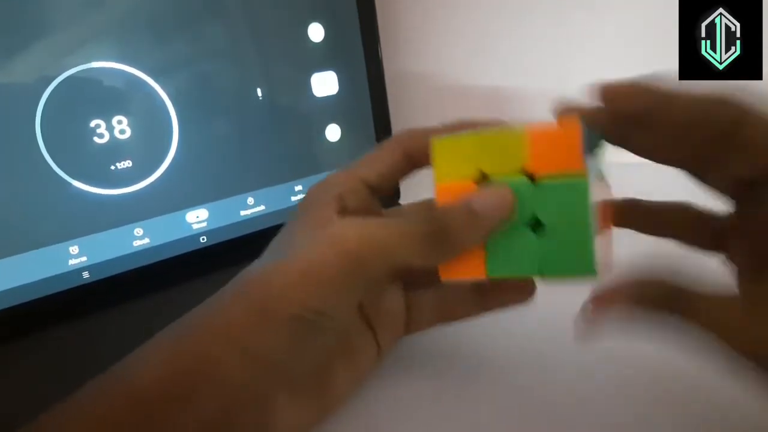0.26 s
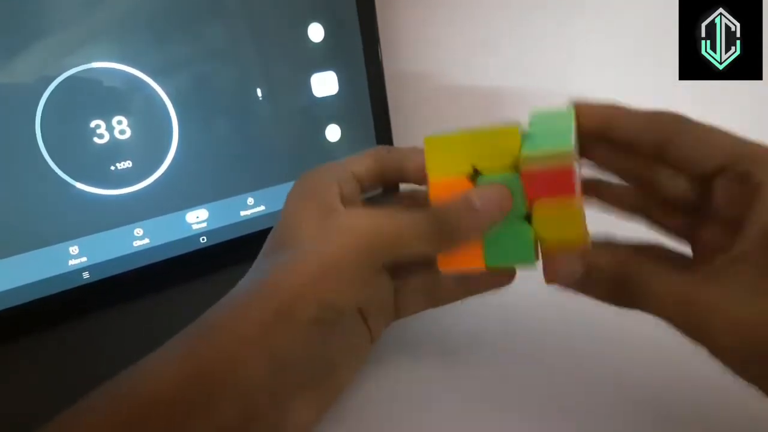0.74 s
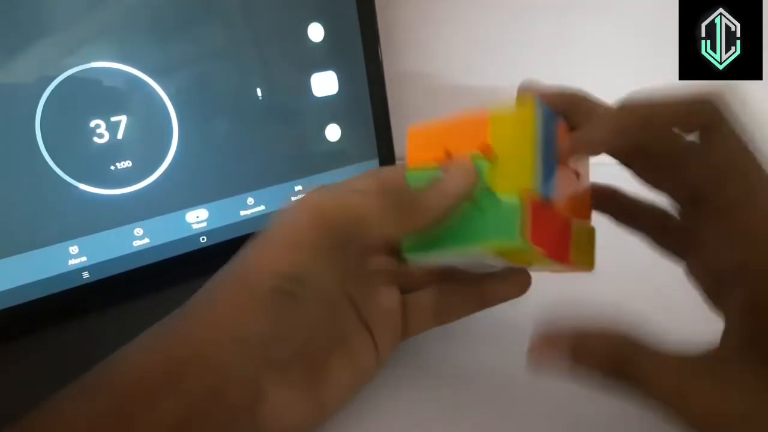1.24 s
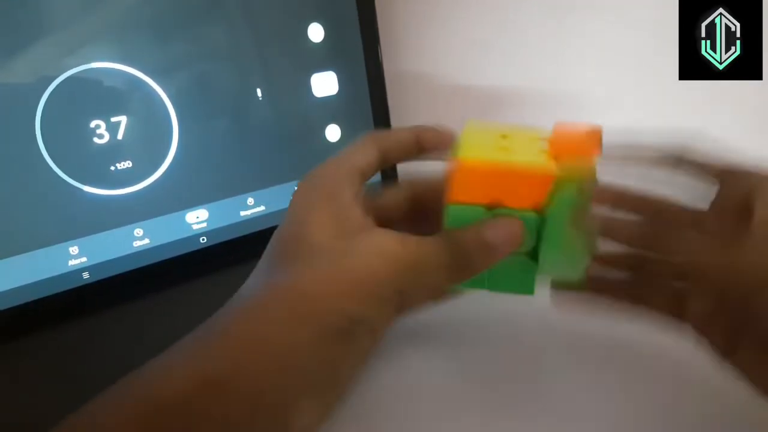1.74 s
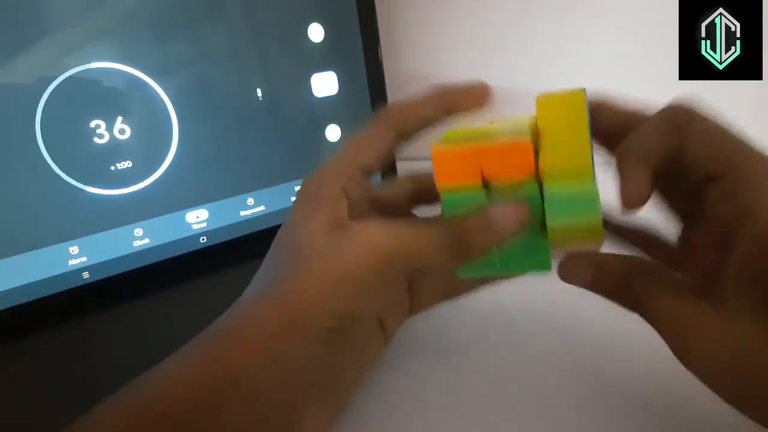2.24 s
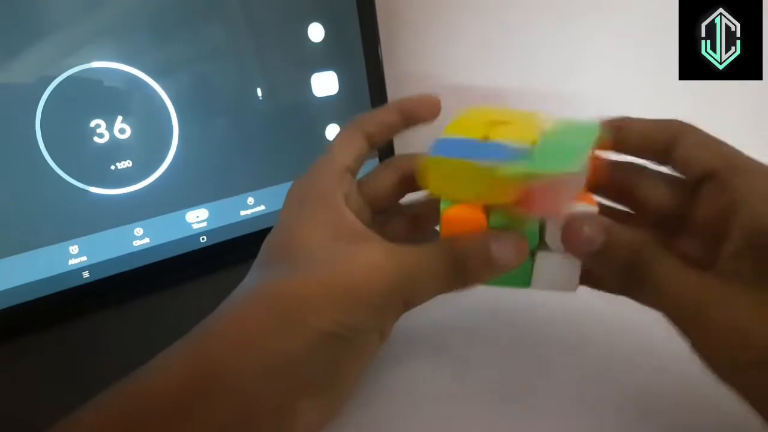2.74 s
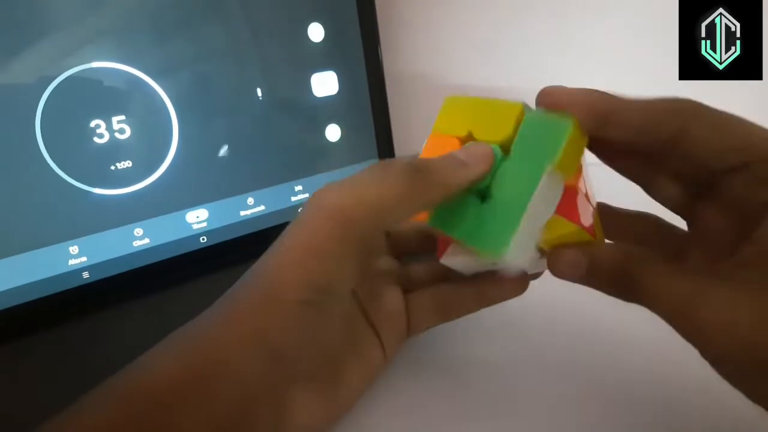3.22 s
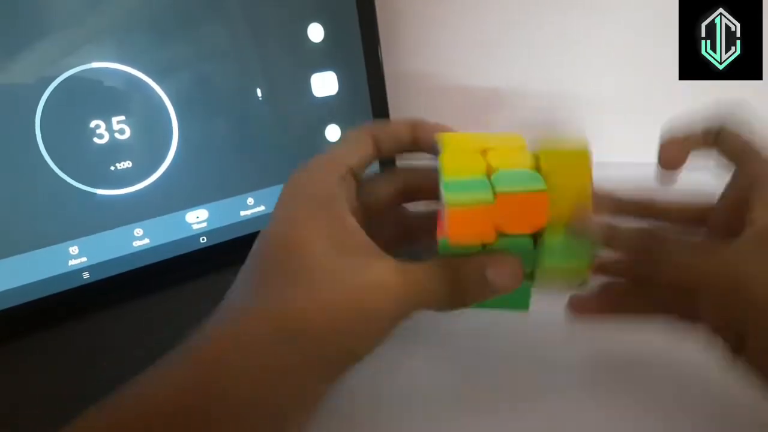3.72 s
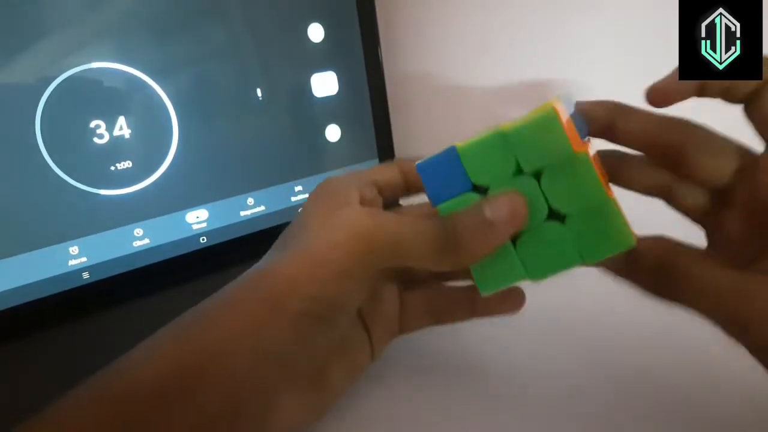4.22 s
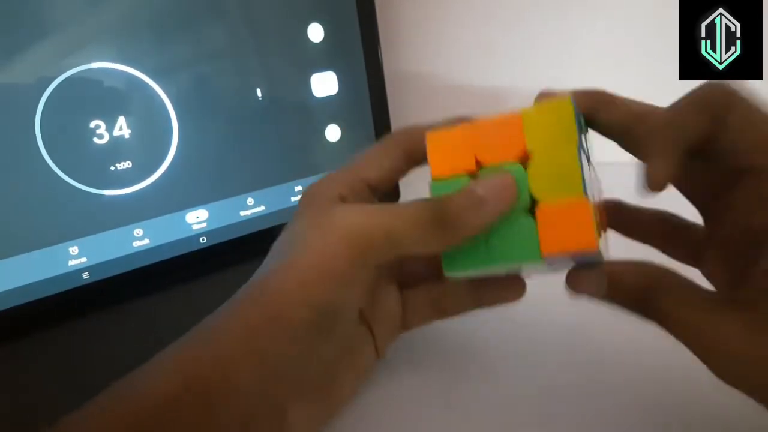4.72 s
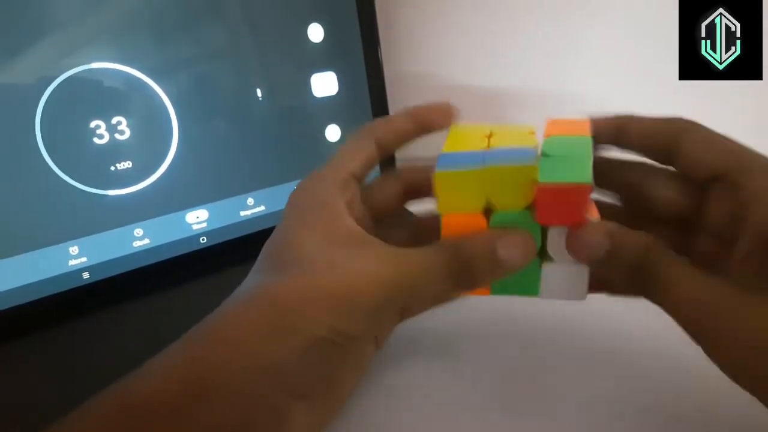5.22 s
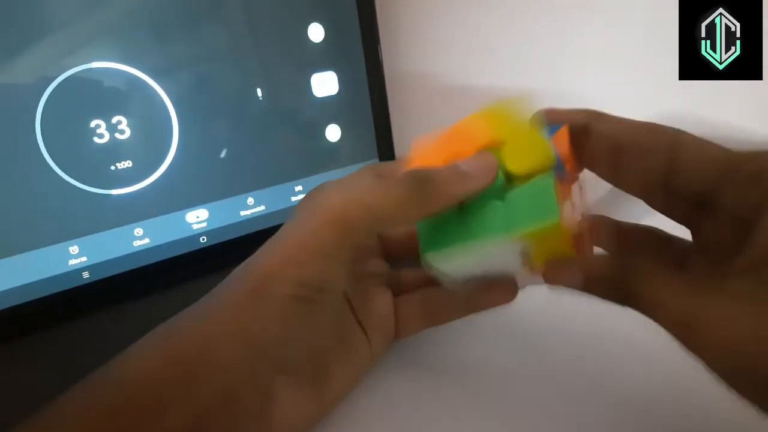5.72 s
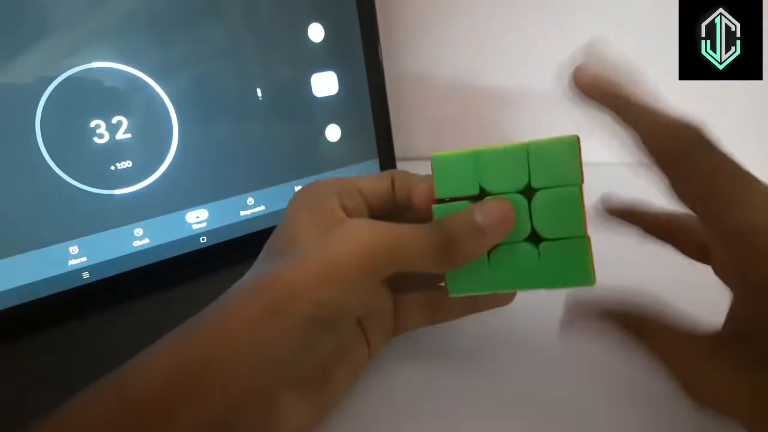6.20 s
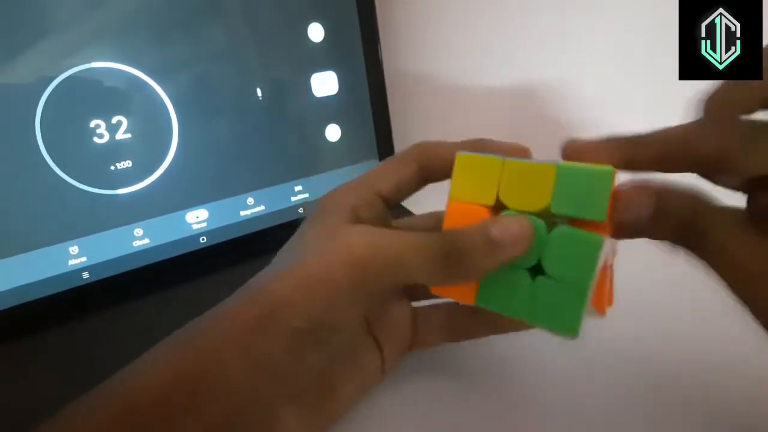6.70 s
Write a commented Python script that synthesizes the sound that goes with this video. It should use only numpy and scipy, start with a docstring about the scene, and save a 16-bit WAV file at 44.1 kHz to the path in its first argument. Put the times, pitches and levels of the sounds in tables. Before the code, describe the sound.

Steady fan air noise fills a small, slightly reverberant room while hands work a plastic cube puzzle near the microphone. Faces rub in short gritty swishes and lock with bright, dry clicks, some hollower, in quick irregular runs. The loudest crack comes midway; the rubbing is strongest near the end. Low wind-like buffets push at the left channel, and turning continues to the cut.

```python
"""A plastic puzzle cube is turned fast by hand in a small room, heard through a left and a right microphone port.
From the start a fan hums as shaped noise and pieces snap: bursts of contacts ring the shell, and the room answers.
Faces scrape in swells of grainy noise. The loudest snap comes near 3.5 s; the rub is strongest near 5.8 and 6.4 s.
The fan's draught buffets the left port with low noise, hardest near 4.8 and 6.4 s. Turning goes on to the end, 6.95 s.
"""
import sys
import numpy as np
from scipy import signal
from scipy.fft import rfft, irfft, next_fast_len
from scipy.io import wavfile
from scipy.ndimage import uniform_filter1d, map_coordinates

SR = 44100
rng = np.random.default_rng(int(sys.argv[2]) if len(sys.argv) > 2 else 0)


def unload_audio(sound):
    """Save the sound as a 16-bit wav file, at the path given as the first command line argument."""
    columns = np.transpose(np.atleast_2d(sound))
    # keep every value between -1 and 1, then stretch to whole-number steps
    steps = np.round(np.clip(columns, -1, 1) * 32767)
    wavfile.write(sys.argv[1], SR, steps.astype(np.int16))


N = 306495


def amp(db):
    """Gain of a level in dB."""
    return 10 ** (np.asarray(db) / 20)


def unit(x):
    """Scale x to an rms of 1."""
    return x / np.sqrt(np.mean(x ** 2) + 1e-20)


def along(points, hz):
    """Read a curve of (Hz, value) points, joined by lines on a log frequency axis."""
    point_hz, value = np.transpose(points)
    return np.interp(np.log(hz + 1), np.log(point_hz + 1), value)


def wobble(rate):
    """A smooth random curve through `rate` random points a second."""
    knots = rng.standard_normal(int(N * rate / SR) + 4)
    return map_coordinates(knots, [np.arange(N) * rate / SR])


def filtered(x, response):
    """Shape the spectrum of x with a response given as a function of frequency."""
    size = next_fast_len(N + SR // 2)
    return irfft(rfft(x, size) * response(np.fft.rfftfreq(size, 1 / SR)), size)[..., :N]


def swells(rows, rise_db_s, fall_db_s):
    """Level in dB of peaks that swell and fade at steady dB per second, their powers added."""
    hop = 64  # samples between computed points
    peak_s, peak_db = np.transpose(rows)[:, :, None]
    late = np.arange(0, N + hop, hop) / SR - peak_s
    drop_db = np.where(late < 0, -rise_db_s * late, fall_db_s * late)
    power = amp(2 * (peak_db - drop_db)).sum(0)
    return np.interp(np.arange(N), np.arange(len(power)) * hop, 10 * np.log10(power + 1e-12))


# Colour of the fan's air noise. Each row: frequency in Hz, relative level in dB per Hz.
FAN_COLOUR = [(25, -36), (60, -17.5), (120, -8), (240, -4), (316, 0), (400, -3.5), (530, -6.5), (660, -19),
              (1050, -13), (1400, -18.5), (1750, -21.5), (2400, -22.5), (4400, -35.5), (16000, -44.5)]
# How alike the fan is at the two ports. Each row: frequency in Hz, likeness (1 the same, 0 unrelated).
FAN_LIKENESS = [(60, 1), (130, 0.83), (300, 0.99), (520, 0.67), (750, 0), (1200, 0.39), (2500, 0),
                (15000, 0.3)]


def fan():
    """Steady air noise, most alike at both ports in the bass: a shared part plus a part of opposite sign."""
    level_db, drift_db, drift_rate = -38, 0.067, 1.42

    def shared_and_opposite(hz):
        angle = np.arccos(np.clip(along(FAN_LIKENESS, hz), -1, 1)) / 2
        return amp(along(FAN_COLOUR, hz)) * [np.cos(angle), np.sin(angle)]

    mid, side = filtered(rng.standard_normal((2, N)), shared_and_opposite)
    return amp(level_db + drift_db * wobble(drift_rate)) * unit(np.array([mid + side, mid - side]))


# Colour of the draught's low rumble. Each row: frequency in Hz, relative level in dB per Hz.
BUFFET_COLOUR = [(15, -63), (40, -7), (70, -3.5), (130, -7), (260, -25), (500, -75)]
# Gusts of the draught. Each row: peak in seconds, level in dB before each port's own gain.
GUSTS = [(.97, -57), (1.24, -52), (1.43, -50), (1.78, -58), (1.92, -51), (2.24, -59), (2.54, -46),
         (2.63, -52), (2.72, -57), (3.5, -54), (3.61, -44), (3.93, -50), (4.14, -50), (4.38, -49),
         (4.42, -41.5), (4.57, -46), (4.78, -35), (4.91, -40), (4.98, -45), (5.03, -38.5), (5.1, -46),
         (5.3, -56), (5.4, -57), (5.64, -48), (5.7, -47), (5.8, -49), (5.94, -53), (6.29, -42),
         (6.39, -31.5), (6.45, -38), (6.65, -41), (6.69, -35.5), (6.89, -38.5)]


def draught():
    """Low pressure pushes on the left port, far weaker on the right; each push follows the gust closely."""
    rise_db_s, fall_db_s = 330, 298
    stir_db, stir_swing_db, stir_rate = -68.5, 5, 9  # the restless air between gusts
    rumble = filtered(rng.standard_normal((2, N)), lambda hz: amp(along(BUFFET_COLOUR, hz)))
    # even out the rumble's own swings over 25 ms, so that the gust sets the strength
    swing = np.sqrt(np.abs(uniform_filter1d(rumble ** 2, size=SR // 40)) + 1e-12)
    stir = amp(stir_db + stir_swing_db * wobble(stir_rate))
    strength = amp(swells(GUSTS, rise_db_s, fall_db_s)) + stir
    port_gain = amp([[6], [-14]])  # left, right in dB
    gusts = port_gain * strength * rumble / swing
    # a light touch of the same colour again
    return filtered(gusts, lambda hz: amp(0.063 * along(BUFFET_COLOUR, hz)))


# Turns of a face. Each row: moment of fastest sliding in seconds, level of the rub in dB.
TURNS = [(0, -50), (.41, -51), (.52, -44), (.74, -55.5), (1.12, -55), (1.44, -61), (1.62, -43), (1.77, -46),
         (1.95, -48), (2.2, -54.5), (2.42, -59), (2.74, -51.5), (2.86, -48.5), (3.12, -56), (3.55, -50),
         (3.69, -46), (3.9, -56), (4.3, -61), (4.55, -56), (4.67, -52), (5.08, -59), (5.3, -44.5),
         (5.69, -49), (5.83, -40), (6.0, -53.5), (6.17, -50), (6.41, -39.5), (6.74, -52.5), (6.95, -48)]


def sliding_level():
    """The rub in dB: it swells as a face speeds up and fades as it slows."""
    return swells(TURNS, rise_db_s=110, fall_db_s=89.5)


# Colour of the scraping. Each row: frequency in Hz, relative level in dB per Hz.
SCRAPE_COLOUR = [(500, -40), (800, -13), (1100, -21), (1700, 0), (2800, 5.5), (4500, -6.5), (8000, -3.5),
                 (12000, -6), (16000, -44)]


def sliding():
    """Plastic faces rub: tiny irregular catches, each a brief fading burst, over a hiss."""
    catches_per_s, catch_spread_db, catch_fade_s = 300, 5, 0.013  # time to fade by 60 dB
    catches = (rng.random(N) < catches_per_s / SR) * amp(rng.normal(0, catch_spread_db, N))
    fade = amp(-60 * np.arange(SR // 50) / SR / catch_fade_s)
    bursts = signal.fftconvolve(catches, fade)[:N]
    grains = (unit(bursts) + 0.92) * rng.standard_normal((2, N))  # 0.92 is the hiss
    scrape = filtered(grains, lambda hz: amp(along(SCRAPE_COLOUR, hz)))
    return amp(sliding_level()) * unit(scrape)


# A typical tick: lag after its snap in seconds, then crack, knock, brightness and upper tone
# on the relative dB scales of the snap table.
TICK_MEAN = [.004, -32.5, -36, 1, 0.5]
# How much ticks vary around that, in the same five columns and units.
TICK_SPREAD = [.02, 4.2, 2.8, 3.3, 5.6]


def ticks():
    """Loose pieces tick faintly around each snap, one tick per snap, louder while a face slides hard."""
    hardens = 0.18  # dB of tick per dB of sliding
    vary = np.multiply(TICK_SPREAD, rng.standard_normal((len(SNAPS), 5)))
    lag_s, *levels = np.transpose(TICK_MEAN + vary)
    s = np.clip(np.transpose(SNAPS)[0] + lag_s, .01, N / SR - .001)
    slide_db = sliding_level()[(s * SR).astype(int)]
    effort_db = hardens * (slide_db - slide_db.mean())
    louder = np.outer(effort_db, [1, 1, 0, 0])  # crack and knock only
    return list(np.column_stack([s, np.transpose(levels) + louder]))


# Resonances of the cube's shell. Each row: frequency in Hz before random detuning, width in Hz,
# relative strength in dB.
SHELL = [(981, 217, 9), (1720, 420, -4.5), (2900, 1080, 13.5), (3700, 3900, 4), (4330, 1810, 16.5),
         (5850, 4150, 17.5), (8980, 1000, 14), (8800, 470, 13), (11140, 4000, 12.5), (15500, 380, -30)]


def shell_ring(f, bright_db, upper_db):
    """Responses of the shell's resonances, slightly detuned and with new strengths for each contact."""
    hz, width, level_db = np.transpose(SHELL)[:, :, None]
    low = hz[:, 0] < 2300  # the hollow knock; the rest is the crack
    detune = 1 + rng.normal(0, .04, hz.shape)
    scatter_db = rng.normal(0, 2.5, hz.shape)
    # brightness counts three times above 7500 Hz; upper tone 7.4 times on the upper knock resonance
    bright_tint_db = 3 * bright_db * (hz > 7500)
    upper_tint_db = 7.4 * upper_db * (hz > 1400) * low[:, None]
    strength = amp(level_db + scatter_db + bright_tint_db + upper_tint_db)
    signs = (-1.) ** np.arange(len(hz))[:, None]  # neighbours alternate in sign
    ring = strength * 1j * f * width / ((hz * detune) ** 2 - f ** 2 + 1j * f * width) * signs
    return ring[~low].sum(0), ring[low].sum(0)


def contacts(t, crack_db, knock_db):
    """The forces on the shell: a rough chatter for the crack, and a push for the knock."""
    noise = rng.standard_normal((5, len(t)))
    after = np.maximum(t, 0)
    # faint noise swells for a few milliseconds before the snap
    approach = amp(-26) * np.exp(np.minimum(t, 0) / 0.0041) * (t < .001)
    # a hollow, full-face contact chatters longer than a thin edge snap; hard blows are over sooner
    stretch_db = 0.12 * (knock_db - crack_db + 10.5) - 0.59 * max(crack_db + 12.5, 0)
    age = after / amp(np.clip(stretch_db, -7, 5))
    onset = 1 - np.exp(-(age / 0.0011) ** 2)
    fade = amp(-60 * age / 0.0098) + 0.24 * amp(-60 * after / 0.019)
    # the chatter differs from port to port; the push has a shared part
    chatter = (approach * amp(min(stretch_db, 0)) + onset * fade) * noise[:3]
    push = 6 * (t == 0) + (t > 0) * amp(-60 * after / 0.02) * (noise[4] + 0.82 * noise[1:4])
    chatter[2] = push[2] = t == 0  # the room's feed gets one clean impulse
    return chatter, push


# Clear snaps. Each row: start in seconds, then in relative dB: level of the crack, level of the hollow knock,
# brightness, and upper knock tone against the lower. The last two are scaled up in the shell.
SNAPS = [(0.0742, -26, -30, 2, -7), (0.0802, -28, -30, 2, 1), (0.095, -14, -22.5, -13, 13),
         (.102, -19, -24.5, 3, -10), (0.1286, -12, -25, 0.5, 11), (0.3489, -31.5, -29.5, 1, -2.5),
         (0.378, -30, -33.5, -0.5, -12), (0.395, -29, -47, -1, 6), (0.431, -28, -39, 3, 7),
         (0.4462, -14, -31, 0.5, 1), (0.4532, -26, -25, -3, 10), (.4775, -13, -25, -9, 0.5),
         (0.546, -19.5, -51, -1.5, 5), (.5845, -7, -28.5, 12, -1.5), (0.6273, -22, -37, -1, 1),
         (0.6401, -19.5, -41, -1, 1), (0.7713, -28, -24, -1.5, -13), (0.9487, -15, -26, 0.5, 0),
         (0.9517, -38, -25, 10, 16), (1.135, -26.5, -41, -6, 8), (1.1806, -33.5, -34.5, -1.5, 0.5),
         (1.2261, -31.5, -26, 2, 1), (1.4495, -32, -33, 0.5, 1.5), (1.4684, -12.5, -19, -9, -13),
         (1.4838, -25, -26, 3, 6), (1.514, -26, -23.5, 2, 2), (1.5327, -14.5, -17, 0.5, 1.5),
         (1.5425, -44, -25.5, -7, 0), (1.608, -15, -37, 3, -3), (1.6125, -7.5, -25, 0.5, 1.5),
         (1.656, -25, -46, -21, 17), (1.716, -26, -25.5, 1, -3), (1.7292, -25, -23, 8, -6),
         (1.7369, -14.5, -22, -2, -1), (1.7493, -8.5, -15, -0.5, -1.5), (1.7543, -16.5, -26, 4, 9),
         (1.815, -24, -29, 3, 6), (1.8381, -21, -28, 0.5, -9), (1.8698, -20.5, -27, 0.5, 10),
         (1.8826, -5.5, -26, 3, 1.5), (1.9003, -17.5, -31, 1.5, -1), (2.0326, -28, -33, -2, 1),
         (2.0656, -20, -17, 1.5, 1.5), (2.099, -27.5, -37, 1, 10), (2.161, -20, -23, -12, 12),
         (2.171, -11.5, -22, -0.5, 15), (2.1787, -23, -28, 7, 11), (2.196, -11, -27, -15, 4),
         (2.207, -7, -22, 1, 1), (2.256, -12, -33, 1, 2), (2.4037, -26, -27.5, 2, -9),
         (2.4126, -19.5, -26, 0.5, 3), (2.4178, -20, -26.5, -10, 9), (2.456, -26.5, -47, -3, 7),
         (2.51, -10, -25.5, 1.5, -10), (2.672, -26, -28, 0.5, -13), (2.695, -27, -19.5, -1, 3),
         (2.739, -18, -33, -3, 7), (2.771, -22, -29.5, 1, 5), (2.782, -19, -31, -1, 7),
         (2.7874, -19, -29, 8, -12), (2.806, -8, -24.5, 0.5, -10), (2.858, -19.5, -38, 1.5, -2),
         (2.886, -24, -40, 0, -5), (2.9126, -10.5, -26, 3.5, -20), (2.9603, -8.5, -28, 1, -4),
         (3.059, -19.5, -34, -15, -9), (3.0939, -15.5, -29, -1, -6.5), (3.1032, -21, -19.5, -1, 1.5),
         (3.161, -29.5, -32, 1, -6), (3.268, -24.5, -34.5, 0, -6), (3.335, -31, -35.5, 1, 2),
         (3.501, -16, -20.5, 3, -6), (3.5069, -0.5, -16.5, 0.5, 1.5), (3.5159, -9.5, -25, -17, 8),
         (3.5683, -23, -27, 3, 2), (3.587, -16.5, -25, 1, 1), (3.6625, -11.5, -18, -13, -5),
         (3.6694, -15, -22, 13, 1.5), (3.704, -19, -25, 12, 12), (3.71, -20, -24.5, -9, -15),
         (3.7194, -14.5, -17, -2, 2.5), (3.7306, -21, -43, 1, 0), (3.737, -29, -29, 4, 6),
         (3.764, -13.5, -44, -1.5, -1), (3.789, -11.5, -21.5, -13, 1.5), (3.906, -27, -39, 2, 1),
         (3.913, -23, -34, 0.5, 2), (3.9244, -21, -35, -1, 6), (3.9422, -9.5, -23, 1.5, 2),
         (4.0004, -18.5, -36, -5, 6), (4.111, -28.5, -31, 1.5, 11), (4.1742, -30.5, -48, -1, 8),
         (4.2934, -25.5, -32.5, 2.5, -10), (4.311, -30, -34.5, -1, 7), (4.3216, -32, -34, 2.5, -8),
         (4.493, -21.5, -29.5, 2, -9), (4.5482, -23.5, -30.5, 1, 2.5), (4.558, -23, -30, -2, 9),
         (4.5678, -19.5, -20.5, 2.5, 13), (4.5815, -18, -27, 1.5, 0.5), (4.6144, -27, -31, 1, 3),
         (4.637, -21, -28.5, 1, -11), (4.8513, -38, -37, -8, 5), (4.8704, -31, -26, 4, -8),
         (4.8822, -11.5, -20, 0.5, 8), (4.9957, -8.5, -22, 1.5, -7), (5.1523, -30, -32, -13, -1.5),
         (5.1793, -28.5, -28, -4, -9), (5.2426, -22.5, -26, 1.5, -10), (5.259, -13.5, -22, 2.5, 10),
         (5.27, -14.5, -24, -11, -0.5), (5.2872, -14.5, -37, -14, 1), (5.299, -23, -46, 1, -5),
         (5.351, -29, -38, 2.5, -1), (5.409, -18.5, -39, 0, -9), (5.417, -20, -29.5, 1, -5),
         (5.4518, -23.5, -26.5, 0.5, -1), (5.468, -26.5, -46, 2, -8), (5.6153, -19, -19.5, -2, -23),
         (5.6829, -17.5, -26.5, -10, 1), (5.702, -21, -27, 1, 2), (5.731, -9.5, -32, 2, 2),
         (5.7713, -23, -41, 2, -1), (5.786, -22, -27, 2, 0), (5.7993, -6.5, -17.5, 0, 1.5),
         (5.828, -17.5, -21, 1, -8), (5.8439, -17, -20, -0.5, -8), (5.8847, -16, -36, -8, -4),
         (5.898, -16, -23.5, -8, 4), (5.9118, -15, -15, 1, 0), (5.9351, -30, -34, 1, -2),
         (5.995, -21.5, -37, 0.5, 9), (6.008, -23, -29, 2, -5), (6.0135, -20, -27, 1, 0),
         (6.148, -29, -33, -2.5, 6), (6.1597, -26.5, -29, -0.5, -21), (6.2914, -34, -31, -1, 1),
         (6.3193, -16.5, -22.5, 2, 0), (6.3654, -36, -28, -7, -13), (6.3852, -12, -25.5, 1.5, 10),
         (6.393, -22, -32, 2, 1), (6.4153, -17, -29, 3, -3), (6.444, -20, -29, -8, -1),
         (6.468, -19, -32, -0.5, -2), (6.6167, -31, -29, -0.5, -12), (6.639, -16.5, -17, 0.5, 2.5),
         (6.7387, -8.5, -38, 1, 8), (6.9076, -23.5, -28, 1.5, 1.5), (6.9281, -24.5, -19, -1, 10),
         (6.932, -19, -22.5, 0, 2)]


def snaps():
    """Each snap or tick is a short chatter of contacts that rings the shell at new strengths.
    Rows: left port, right port, and the smoother sum of all directions that feeds the room."""
    out, size, lead = np.zeros((3, N + SR)), 2048, 300  # samples per snap, and before its start
    t, f = (np.arange(size) - lead) / SR, np.fft.rfftfreq(size, 1 / SR)
    low_cut = f ** 2 / (f + 700 / 1j) ** 2  # thins the knock below about 700 Hz
    for s, crack_db, knock_db, bright_db, upper_db in SNAPS + ticks():
        chatter, push = contacts(t, crack_db, knock_db)
        crack_ring, knock_ring = shell_ring(f, bright_db, upper_db)
        crack = irfft(rfft(chatter) * crack_ring)
        knock = irfft(rfft(push) * knock_ring * low_cut)
        blow = amp(crack_db - 17.0) * crack / crack.std(1)[:, None]
        blow += amp(knock_db - 14.0) * knock / knock.std(1)[:, None]
        out[:, round(s * SR) - lead:][:, :size] += blow
    return out[:, :N]


# How long the room rings. Each row: frequency in Hz, time to fade by 60 dB in seconds.
ROOM_FADE = [(500, 0.43), (2000, 0.45), (6000, 0.34), (15000, 0.33)]


def room(x, piece_s=.15):
    """Each frequency dies at its own speed; the cube moves, so the tail is new for each stretch."""
    wall_s, wall_db, wall_width_s = 0.01373, 10.5, 0.00091  # the nearest walls answer in a bunch
    out, step, t = np.zeros((2, N + 2 * SR)), int(piece_s * SR), np.arange(SR // 2) / SR
    arrival = np.clip(t / .007, 0, 1)
    onset = arrival * amp(wall_db * np.exp(-((t - wall_s) / wall_width_s) ** 2))
    for start in range(0, N, step):
        hz, frames, z = signal.stft(rng.standard_normal((2, SR // 2)), SR, nperseg=256)
        fade = amp(-60 * frames / along(ROOM_FADE, hz)[:, None])
        tail = onset * signal.istft(z * fade, SR, nperseg=256)[1][:, :len(t)]
        wet = signal.fftconvolve(x[None, start:start + step], tail / np.linalg.norm(tail[0]), axes=1)
        out[:, start:][:, :wet.shape[1]] += wet
    return out[:, :N]


def scene():
    """Fan, draught and scraping, with the snapping cube and its room."""
    cube = snaps()
    return fan() + draught() + sliding() + amp(-8.5) * room(cube[2]) + cube[:2]


# The two ports differ in colour. Each row: frequency in Hz, left minus right in dB.
PORT_COLOUR = [(200, 0), (700, 2), (1300, -0.5), (2400, 4.5), (4200, -4), (5500, 0), (7000, -10.5),
               (8500, 9), (10000, 8), (12000, 10.5), (15000, 2.5)]
# Roll-off of the treble. Each row: frequency in Hz, gain in dB.
TREBLE = [(15600, -1), (16000, -31), (16900, -24)]


def record(dry):
    """Each port has its colour; the highest peaks are squeezed; nothing is kept above the band limit."""
    top_hz, ceiling = 16950, .82
    half_each = np.array([[.5], [-.5]])  # left gets half the difference, right the opposite half
    ports = filtered(dry, lambda hz: amp(half_each * along(PORT_COLOUR, hz)))
    squeezed = ports / (1 + np.abs(ports / ceiling) ** 8) ** (1 / 8)
    return filtered(squeezed, lambda hz: amp(along(TREBLE, hz)) * (hz < top_hz))


dry = scene()
out = record(dry)
unload_audio(out)
```